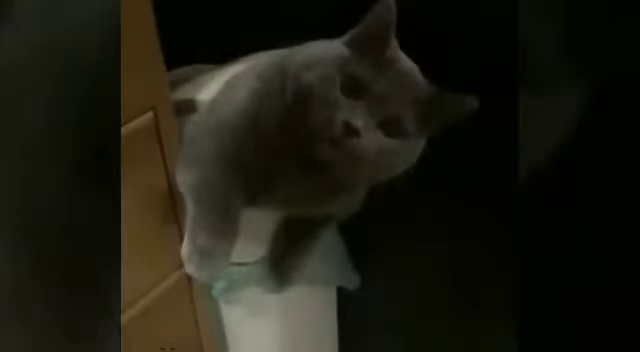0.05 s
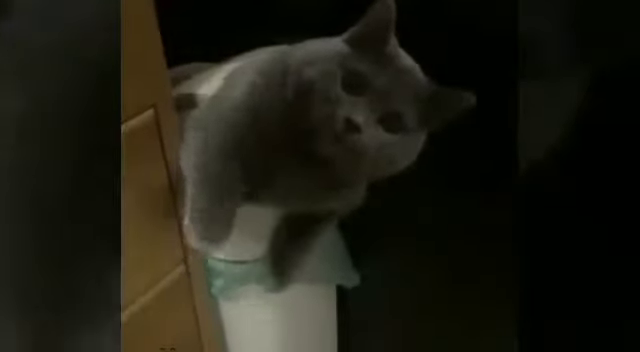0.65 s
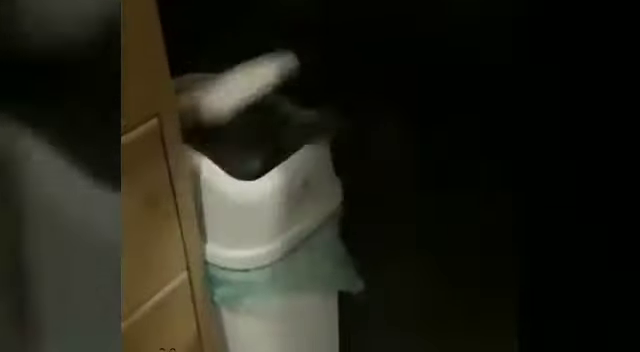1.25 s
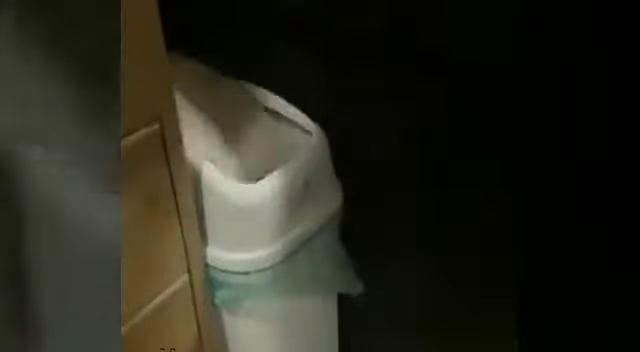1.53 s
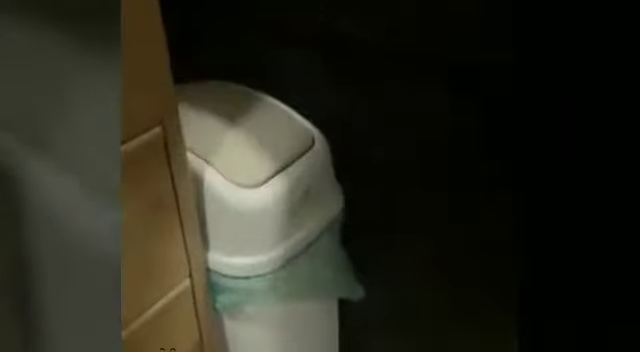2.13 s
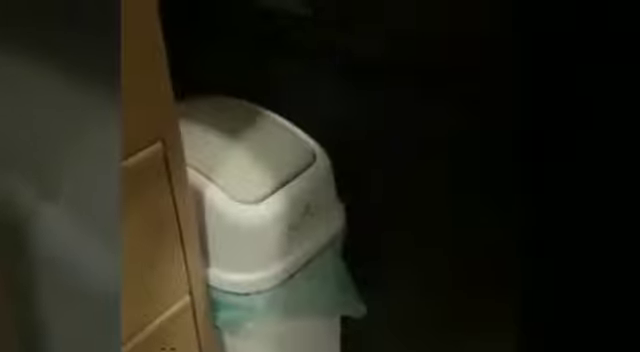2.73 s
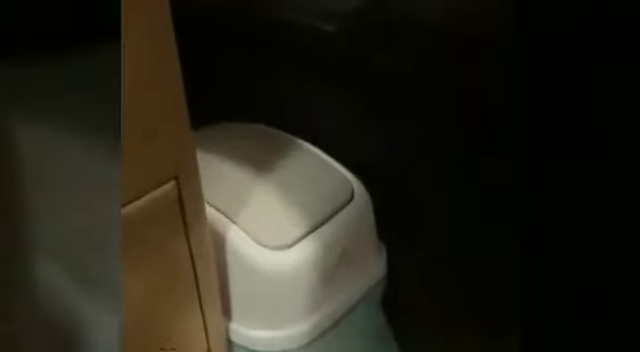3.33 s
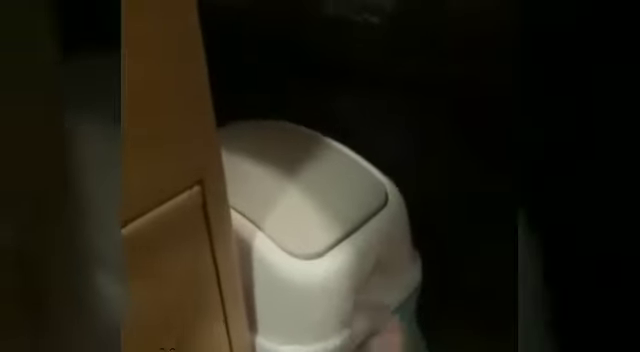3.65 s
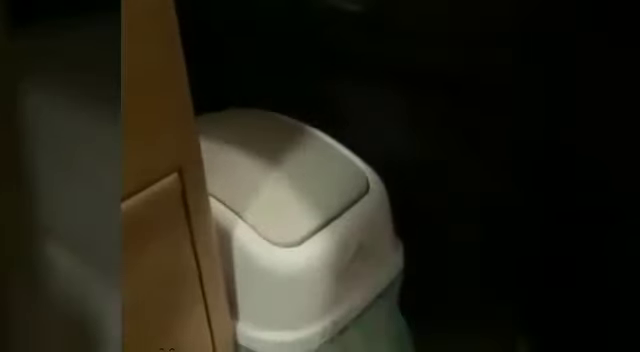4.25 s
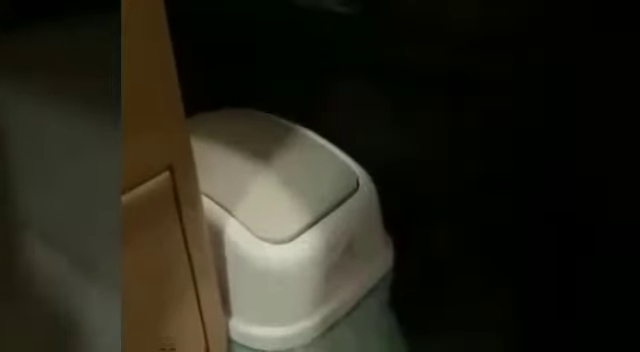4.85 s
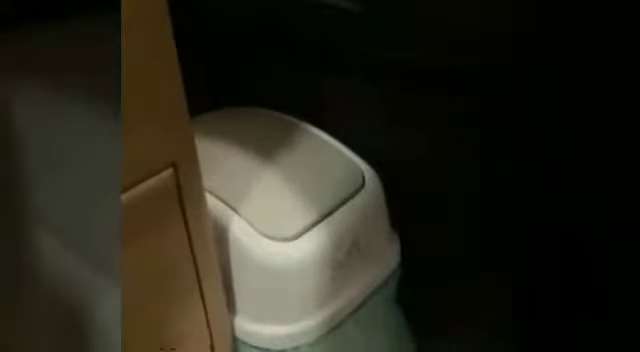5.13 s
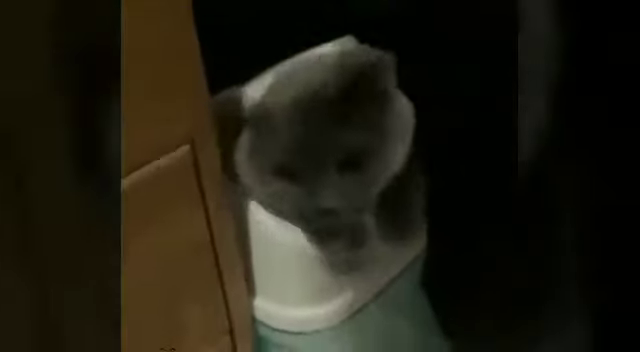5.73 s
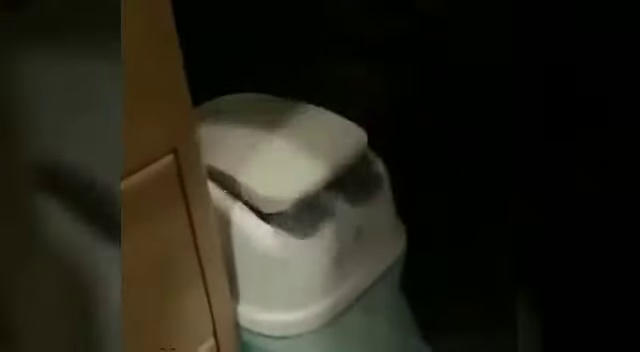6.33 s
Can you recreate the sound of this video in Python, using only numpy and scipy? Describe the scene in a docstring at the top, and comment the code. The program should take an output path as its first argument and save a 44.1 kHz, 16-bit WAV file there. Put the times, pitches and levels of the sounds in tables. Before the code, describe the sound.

Heard up close in a small room with a faint low hum, a hollow plastic bin bumps and its liner crinkles as a cat drops inside. The swinging lid clicks a few times and settles. Cloth brushes, and four knuckle knocks sound on the plastic. After a short hush comes the loudest moment, a sudden clattering thud as the cat pushes out, followed by soft rustling and small bumps.

```python
"""A cat in a plastic swing-top bin, on two close microphones in a small quiet room.
It slips down inside: the liner crinkles, fur rubs the rim, the walls ring and thud under its weight.
The flap swings shut and ticks to rest. A sleeve swishes as a hand reaches out and knocks four times
on the hollow hood; the cat bursts up through the flap and sinks back."""
import sys
import numpy as np
from scipy import signal
from scipy.fft import rfft, irfft, next_fast_len
from scipy.io import wavfile
from scipy.ndimage import uniform_filter1d

SR = 44100
rng = np.random.default_rng(int(sys.argv[2]) if len(sys.argv) > 2 else 0)


def to_wav(sig):
    """Store sig (one row per channel, or 1-D mono) as 16-bit WAV at the path in sys.argv[1].

    Samples outside -1..1 are clipped; the rate is SR.
    """
    pcm = np.clip(np.atleast_2d(sig), -1, 1) * 32767
    pcm = np.round(pcm).astype(np.int16)
    wavfile.write(sys.argv[1], SR, pcm.T)  # frames by channels


N = 281918
RING_TIME = np.arange(SR // 3) / SR

# Spectra of the room's murmur and the microphones' hiss. Each row: frequency in Hz, relative level in dB.
MURMUR_COLOUR = [(22, -27), (32, -5), (52, 3), (120, -5), (170, -11), (280, -10), (500, -20.5),
                 (800, -23.5), (1050, -21.5), (1700, -31), (4500, -40.5), (11500, -61)]
MIC_COLOUR = [(1000, 6), (3000, 1), (5500, -1), (9500, -0.5), (12000, -6.5), (15000, -10)]
# The cat slips in and lands, later rises and sinks back. Each row: start in seconds, length in seconds,
# then relative levels in dB of liner crinkle, fur rub and wall rumble.
CAT_MOVES = [(0.842, 0.21, -59, -78, -82), (0.996, 0.11, -60, -56.5, -52), (1.14, 0.19, -65, -61, -53),
             (1.34, 0.031, -54.5, -43, -70), (1.423, 0.098, -51, -51, -40.5),
             (1.549, 0.059, -55, -51.5, -63), (1.696, 0.11, -87, -60, -53.5),
             (5.416, 0.13, -60, -57.5, -45.5), (5.511, 0.017, -48, -43, -41.5),
             (5.584, 0.084, -78, -48, -69), (5.705, 0.23, -70, -63, -64), (5.912, 0.26, -69, -58.5, -59),
             (6.227, 0.34, -67.5, -56.5, -54.5)]
# Spectra of liner, fur and rumbling wall. Each row: frequency in Hz, relative level in dB.
LINER_COLOUR = [(1180, -28), (2000, -1), (3140, -4.5), (4000, -6), (5200, -6), (6940, -7.5), (10000, -5.5),
                (11800, -20), (15600, -59), (22000, -120)]
FUR_COLOUR = [(120, -16), (200, 2.5), (339, 3.5), (390, -5), (600, -3.5), (1170, -6.5), (1730, -10),
              (4000, -15.5), (5200, -36), (8800, -120)]
WALL_COLOUR = [(25, -23), (55, 9.5), (120, 2), (250, -5.5), (500, -28)]
# The flap hits its pivots and rim. Each row: start in seconds, relative level in dB, favoured pitch in Hz.
FLAP_TICKS = [(0.9515, -40, 3170), (1.361, -34.5, 2230), (1.5762, -26.5, 4240), (1.7615, -40, 1300),
              (1.8023, -21.5, 2930), (1.9585, -32, 4000), (2.0833, -39.5, 2730), (2.161, -41.5, 1960),
              (2.2425, -44, 2100), (2.5742, -42.5, 1390), (5.5892, -19, 1960)]
# Cat, flap and hand bump the bin. Each row: start in seconds, relative ring and crack levels in dB,
# favoured pitch in Hz.
BIN_BUMPS = [(1.06, -26, -48, 197), (1.361, -28, -38, 257), (1.375, -36, -43, 710),
             (1.384, -29.5, -33.5, 298), (1.398, -20.5, -41, 237), (1.4108, -27, -35, 780),
             (1.506, -26, -58, 290), (1.611, -22, -53.5, 235), (1.7274, -33.5, -49.5, 356),
             (1.932, -30, -59.5, 241), (2.085, -32.5, -61, 270), (4.257, -48, -44, 200),
             (5.5329, -10, -21, 310), (5.538, -13.5, -22.5, 1200), (5.5486, -4, -16, 510),
             (5.658, -21.5, -37.5, 332), (5.6926, -14, -29, 300), (6.059, -38.5, -57, 285),
             (6.3296, -39, -55.5, 298)]
# The wall gives under a weight. Each row: start in seconds, level in dB, seconds to the peak,
# pitch at the peak in Hz.
WALL_THUDS = [(1.06, -25.5, 0.017, 80), (1.362, -34.5, 0.026, 94), (1.409, -27, 0.021, 60.7),
              (1.619, -46, 0.035, 56), (1.801, -45, 0.018, 100.5), (4.235, -35, 0.027, 90),
              (5.5293, -15.5, 0.0077, 121), (5.555, -24, 0.0267, 83), (5.699, -32.5, 0.021, 66)]
# A paw slips off the rim, then four knuckle knocks. Each row: start in seconds, relative ring, crack
# and tick levels in dB, favoured pitch in Hz, speed factor of the low note.
HOOD_KNOCKS = [(1.1169, -32.5, -32.5, -80, 1420, 0.935), (3.7003, -26.5, -26.5, -47.5, 1860, 1.017),
               (3.89, -21, -22, -47.5, 1280, 1.027), (4.0649, -20, -18, -36.5, 1600, 1.014),
               (4.2166, -22, -21, -36.5, 1870, 1.01)]
# Modes of the flap, the bin and the hood's upper range. Each row: frequency in Hz, relative level in dB,
# seconds to fall 60 dB.
FLAP_MODES = [(664, 16, 0.053), (1405, 0.5, 0.03), (1970, 4.5, 0.017), (2610, -3.5, 0.033),
              (3210, -2.5, 0.026), (3580, -14, 0.043), (4050, -0.5, 0.023)]
BIN_MODES = [(154, -9, 0.074), (180.3, -3.5, 0.17), (204, -2, 0.095), (232.4, 3, 0.091), (283, 3.5, 0.05),
             (363.5, 4.5, 0.062), (440, 0.5, 0.0372), (515.4, 3, 0.036), (631, 0, 0.053),
             (640, -4.5, 0.036), (838, -7, 0.034), (1052, -6, 0.06), (1160, 2, 0.038), (1302, -5, 0.042),
             (1415, -5, 0.051), (1605, -2, 0.048), (1943, 0.5, 0.028)]
HOOD_HIGH_MODES = [(880, -20, 0.082), (1085, -8, 0.025), (1385, -5.5, 0.018), (1760, 0, 0.014),
                   (2135, -6, 0.016), (2520, -24, 0.035), (3170, -9, 0.012), (4060, -21, 0.0121)]
# The hood's hollow low modes, before a knock's speed factor. Each row: frequency in Hz,
# relative level in dB, seconds to the peak.
HOOD_LOW_MODES = [(82, -18.5, 0.049), (136.3, -13.5, 0.012), (128, -21, 0.031), (223, -8.5, 0.011),
                  (311.3, 2.5, 0.009), (518, -8.5, 0.0046)]
# Contact noise of a flap tick, a bump and a knuckle. Each row: frequency in Hz, relative level in dB.
TICK_COLOUR = [(200, -2), (800, -9), (1500, 1.5), (2700, -3.5), (4200, 0.5), (5200, -8.5), (7000, -3.5),
               (12000, -3)]
BUMP_COLOUR = [(150, 4), (300, -0.5), (700, -6), (1200, -5), (1700, -8.5), (2700, -21.5), (4000, -23.5),
               (5500, -30), (9000, -32.5), (12000, -43)]
KNUCKLE_COLOUR = [(1500, -54), (3500, 7.5), (5000, -6), (6800, 6), (9500, 7), (12000, -7)]
# The arm reaches out, knocks and draws back. Each row: start in seconds, length in seconds,
# swish level in dB, hiss level in dB.
SLEEVE_STROKES = [(2.528, 0.18, -59.5, -74), (3.172, 0.48, -65.5, -87), (3.613, 0.12, -46.5, -55.5),
                  (3.676, 0.08, -45.5, -79), (3.748, 0.1, -51, -50), (3.869, 0.034, -40, -52),
                  (3.94, 0.049, -55, -62), (4.254, 0.007, -49, -51)]
# Spectra of the sleeve's swish and its fibres' hiss. Each row: frequency in Hz, relative level in dB.
CLOTH_COLOUR = [(300, -4), (650, -10.5), (1000, -10.5), (1600, -7), (2400, -7.5), (3100, -16.5),
                (4000, -13), (5500, -23.5)]
FIBRE_COLOUR = [(2350, -23), (4000, -9), (5000, -15.5), (6400, 3), (7580, -5), (9800, -1), (12000, -12),
                (15600, -49), (22000, -120)]
# The small room's decay. Each row: frequency in Hz, seconds to fall 60 dB.
ROOM_DECAY = [(70, 0.78), (300, 0.21), (1500, 0.26), (9000, 0.25)]
# Base stereo width at the microphones. Each row: frequency in Hz, side level against mid in dB.
STEREO_WIDTH = [(550, -22), (1000, -15), (2000, -14), (4000, -4), (9000, -7)]


def amp(db):
    return 10 ** (np.asarray(db) / 20)


def unit(x):
    """Scales to rms 1."""
    return x / np.sqrt(np.mean(x ** 2) + 1e-20)


def read(points, hz):
    """Reads a table on a log-frequency axis."""
    f, value = np.transpose(points)
    return np.interp(np.log(hz + 1), np.log(f + 1), value)


def add(mix, start_s, sound):
    part = mix[round(start_s * SR):][:len(sound)]
    part += sound[:len(part)]


def shaped(x, colour):
    """Gives x a spectrum, at rms 1."""
    size = next_fast_len(len(x))
    gain = amp(read(colour, np.fft.rfftfreq(size, 1 / SR)))
    return unit(irfft(rfft(x, size) * gain, size)[:len(x)])


def room_tone(murmur_db=-59, hiss_db=-76.5):
    """A low steady murmur of the house, and the hiss of the microphones."""
    murmur = amp(murmur_db) * shaped(rng.standard_normal(N), MURMUR_COLOUR)
    return murmur + amp(hiss_db) * shaped(rng.standard_normal(N), MIC_COLOUR)


def gestures(rows, ease, t60):
    """Gain of moves (start s, length s, dB): each rises for the share `ease`, holds and dies away."""
    t = np.arange(0, N, 32) / SR
    start, length, db = np.transpose(rows)[:, :, None]
    rise = np.sin(np.pi / 2 * np.clip((t - start) / (ease * length), 0, 1)) ** 2
    fall = amp(-60 * np.maximum(t - start - length, 0) / t60)
    return np.interp(np.arange(N) / SR, t, np.linalg.norm(amp(db) * rise * fall, axis=0))


def band_flicker(x, patchy_db):
    """Random narrow bands swell and dip for a few hundredths of a second, making the rustle patchy."""
    spectra = signal.stft(x, SR, nperseg=512)[2]
    bands = uniform_filter1d(rng.standard_normal(spectra.shape), size=7, axis=0)
    patches = unit(uniform_filter1d(bands, size=11, axis=1))
    return unit(signal.istft(spectra * amp(patchy_db * patches), SR, nperseg=512)[1][:N])


def grains(colour, per_s, spread_db, clump_db, patchy_db, clump_s=0.04):
    """Dense little snaps of uneven size that come in clumps."""
    clumps = clump_db * unit(uniform_filter1d(rng.standard_normal(N), int(clump_s * SR)))
    sizes = amp(spread_db * np.minimum(rng.exponential(1, N), 4) + clumps) * rng.standard_normal(N)
    snaps = sizes * (rng.random(N) < per_s / SR)
    return band_flicker(shaped(snaps, colour), patchy_db)


def cat_stirring(fur_db=-1, hollow_db=-5, ease=0.56):
    """The liner crinkles, fur rubs the rim and rings the bin, the wall rumbles under the cat's weight."""
    start, length, crinkle_db, rub_db, weight_db = np.transpose(CAT_MOVES)
    crinkle = gestures(np.c_[start, length, crinkle_db], ease, t60=0.31)
    rub = gestures(np.c_[start, length, rub_db], ease, t60=0.51)
    weight = gestures(np.c_[start, length, weight_db], ease, t60=1)
    liner = grains(LINER_COLOUR, per_s=4000, spread_db=3.6, clump_db=2, patchy_db=4.2)
    fur = grains(FUR_COLOUR, per_s=6000, spread_db=2.6, clump_db=1.4, patchy_db=3.6)
    t = RING_TIME
    shell = sum(amp(db - 60 * t / t60) * np.sin(2 * np.pi * hz * t) for hz, db, t60 in BIN_MODES)
    hollow = unit(signal.fftconvolve(np.diff(fur, prepend=0), shell)[:N])
    rumble = shaped(rng.standard_normal(N), WALL_COLOUR)
    return crinkle * liner + rub * (amp(fur_db) * fur + amp(hollow_db) * hollow) + weight * rumble


def burst(colour, t60):
    """Many close, quickly damped plastic modes: a dying puff of noise."""
    envelope = amp(-60 * RING_TIME / t60)
    rise = 1 - np.exp(-RING_TIME / .0002)
    puff = shaped(rng.standard_normal(len(RING_TIME)), colour) * envelope * rise
    return puff * np.linalg.norm(envelope) / np.linalg.norm(puff)


def ringing(modes, centre_hz, octaves):
    """Dying modes struck at one spot, which favours those near one pitch."""
    hz, db, t60 = np.transpose(modes)[:, :, None]
    favour = 1 / (1 + (np.log2(hz / centre_hz) / octaves) ** 2)
    return (favour * amp(db - 60 * RING_TIME / t60) * np.sin(2 * np.pi * hz * RING_TIME)).sum(0)


def dispersed(x, delay_s, lowest_hz=300):
    """Lower bending waves run slower, so a click falls in pitch; delay_s is their lag at 1 kHz."""
    hz = np.fft.rfftfreq(len(x), 1 / SR)
    lag = delay_s * 1000 / np.maximum(hz, lowest_hz)
    return irfft(rfft(x) * np.exp(-2j * np.pi * np.cumsum(lag) * hz[1]), len(x))


def flap_ticks(level_db=-8, ring_db=-3, soft_db=-44, soft_hz=4500, db_per_octave=9):
    """Hard plastic clicks ring the flap; the weaker ones are duller."""
    out = np.zeros(N)
    for start, db, centre_hz in FLAP_TICKS:
        ring = dispersed(ringing(FLAP_MODES, centre_hz, octaves=0.41), delay_s=0.001938)
        click = burst(TICK_COLOUR, t60=0.033) + amp(ring_db) * ring
        limit_hz = min(soft_hz * 2 ** ((db - soft_db) / db_per_octave), SR / 3)
        add(out, start, amp(db + level_db) * signal.lfilter(*signal.butter(2, limit_hz, fs=SR), click))
    return out


def bin_bumps(ring_trim_db=-6, crack_trim_db=4, hard_contact_s=0.00046, doubling_db=8):
    """Heavy blows ring the whole bin, the low modes arriving last."""
    out = np.zeros(N)
    for start, ring_db, crack_db, centre_hz in BIN_BUMPS:
        contact_s = hard_contact_s * 2 ** ((ring_db - crack_db) / doubling_db)
        press = 1 - np.exp(-(RING_TIME / contact_s) ** 2)  # a longer contact starts more softly
        ring = amp(ring_db + ring_trim_db) * ringing(BIN_MODES, centre_hz, octaves=0.61)
        crack = amp(crack_db + crack_trim_db) * burst(BUMP_COLOUR, t60=0.053)
        add(out, start, dispersed(press * (ring + crack), delay_s=0.000817, lowest_hz=135))
    return out


def wall_thuds(swell=3):
    """The bin's wall flexes: a deep note that swells and sinks in pitch."""
    out = np.zeros(N)
    for start, db, peak_s, hz in WALL_THUDS:
        age = RING_TIME / peak_s  # 1 at the peak
        cycles = np.cumsum(hz * np.sqrt(1.1 / (np.minimum(age, 1.6) + .1))) / SR
        add(out, start, amp(db) * (age * np.exp(1 - age)) ** swell * np.sin(2 * np.pi * cycles))
    return out


def room_boom(x, hz=54, width_hz=10, db=-5):
    """The room's lowest standing wave hums on after each thud."""
    return x + amp(db) * signal.lfilter(*signal.iirpeak(hz, hz / width_hz, SR), x)


def hood_knocks(crack_trim_db=3, tick_trim_db=9, swell=4.8):
    """A knuckle or paw cracks on the hood in a falling chirp; the shell swells into a short low note."""
    out = np.zeros(N)
    uneven_db = 2 * rng.standard_normal((len(HOOD_KNOCKS), len(HOOD_HIGH_MODES)))  # by spot and mode
    for (start, ring_db, crack_db, tick_db, centre_hz, speed), spot in zip(HOOD_KNOCKS, uneven_db):
        t = RING_TIME * speed
        note = sum(amp(db) * (t / peak * np.exp(1 - t / peak)) ** swell * np.sin(2 * np.pi * hz * t)
                   for hz, db, peak in HOOD_LOW_MODES)
        modes = [(hz, db + more, t60) for (hz, db, t60), more in zip(HOOD_HIGH_MODES, spot)]
        crack = dispersed(ringing(modes, centre_hz, octaves=0.69), delay_s=0.00202)
        add(out, start, amp(tick_db + tick_trim_db) * burst(KNUCKLE_COLOUR, t60=0.021))
        add(out, start, amp(crack_db + crack_trim_db) * crack)
        add(out, start, amp(ring_db) * note)
    return out


def sleeve(ease=0.49, t60=0.12):
    """Fine cloth fibres slip over each other as the arm moves."""
    start, length, swish_db, hiss_db = np.transpose(SLEEVE_STROKES)
    swish = gestures(np.c_[start, length, swish_db], ease, t60)
    hiss = gestures(np.c_[start, length, hiss_db], ease, t60)
    cloth = grains(CLOTH_COLOUR, per_s=7000, spread_db=2.3, clump_db=1.6, patchy_db=3)
    fibres = grains(FIBRE_COLOUR, per_s=10000, spread_db=3, clump_db=2, patchy_db=3.2)
    return swish * cloth + hiss * fibres


def room(x, wet_db, gap_s=0.0031):
    """Dense weak reflections from near walls, the bass lasting longest."""
    echoes = rng.standard_normal(SR // 2) * (rng.random(SR // 2) < .1)
    hz, t, spectra = signal.stft(echoes, SR, nperseg=256)
    tail = signal.istft(spectra * amp(-60 * t / read(ROOM_DECAY, hz)[:, None]), SR, nperseg=256)[1]
    tail *= np.clip(np.arange(len(tail)) / SR / gap_s - 1, 0, 1)  # fades in after the gap
    return x + amp(wet_db) * signal.fftconvolve(x, tail / np.linalg.norm(tail))[:N]


def mic_pair(mid, wider_db):
    """Two close microphones: alike in the bass, their phases scattered apart in the treble."""
    hz = np.fft.rfftfreq(512, 1 / SR)
    flips = (hz > 1000) & (rng.random(len(hz)) < .15)
    sign = np.cumprod(np.where(flips, -1, 1))
    scatter = np.fft.fftshift(irfft(1j * sign * amp(read(STEREO_WIDTH, hz) + wider_db)))[1:]
    side = signal.fftconvolve(mid, scatter * np.hanning(len(scatter)), "same")
    return np.array([mid + side, mid - side])


def scene():
    """At the microphones: blows and ticks with a little of the room, the rustles dry."""
    hood = mic_pair(room(hood_knocks(), wet_db=-17.5), wider_db=-1)
    body = mic_pair(room(room_boom(bin_bumps() + wall_thuds()), wet_db=-14.5), wider_db=1)
    flap = mic_pair(room(flap_ticks(), wet_db=-16.5), wider_db=-8)
    rustle = mic_pair(cat_stirring(), wider_db=3) + mic_pair(sleeve(), wider_db=3)
    return hood + body + flap + rustle + mic_pair(room_tone(), wider_db=2.5)


def record(dry):
    """Both microphones pass a 39 Hz low cut and a 12 kHz band limit."""
    cut = signal.sosfilt(signal.butter(2, 39, "highpass", fs=SR, output="sos"), dry)
    band_limit = signal.firwin(301, 12000, window=("kaiser", 8), fs=SR)
    return signal.oaconvolve(cut, band_limit[None], "same")


dry = scene()
out = record(dry)
to_wav(out)
```